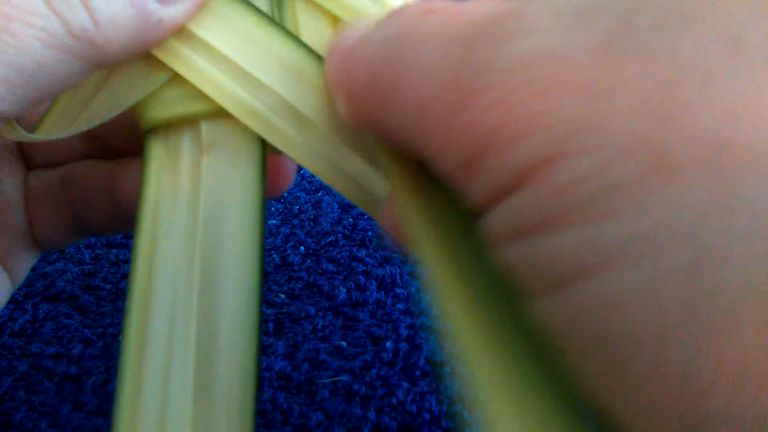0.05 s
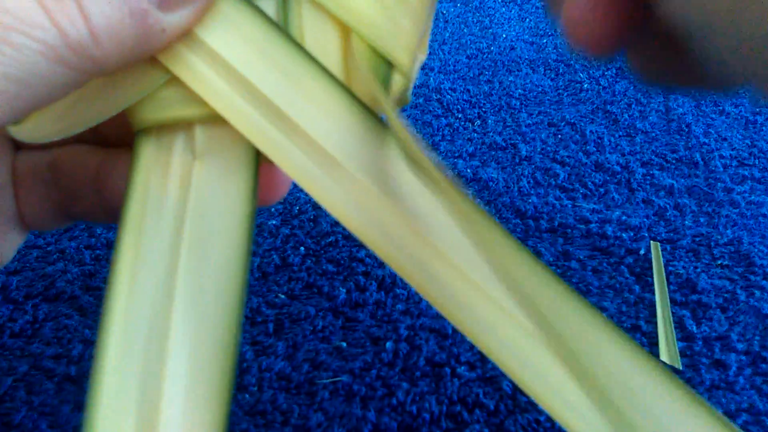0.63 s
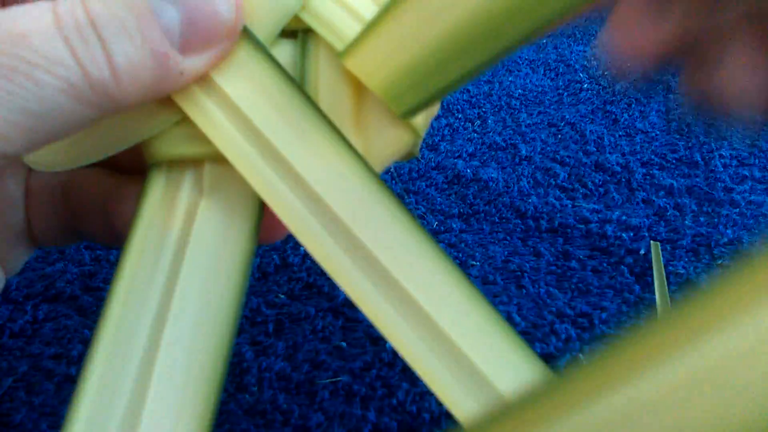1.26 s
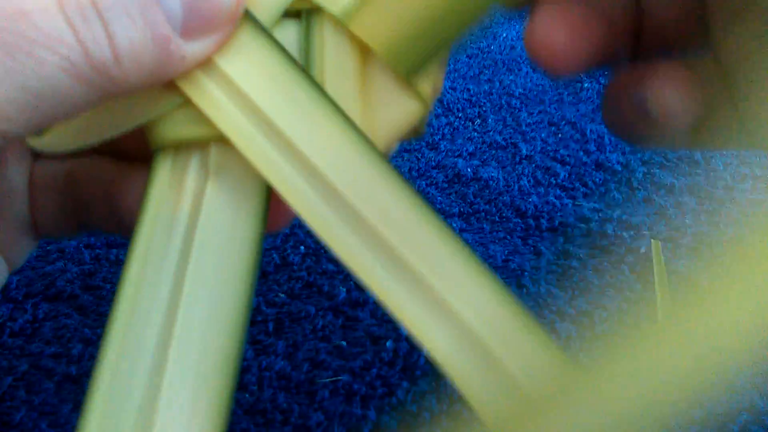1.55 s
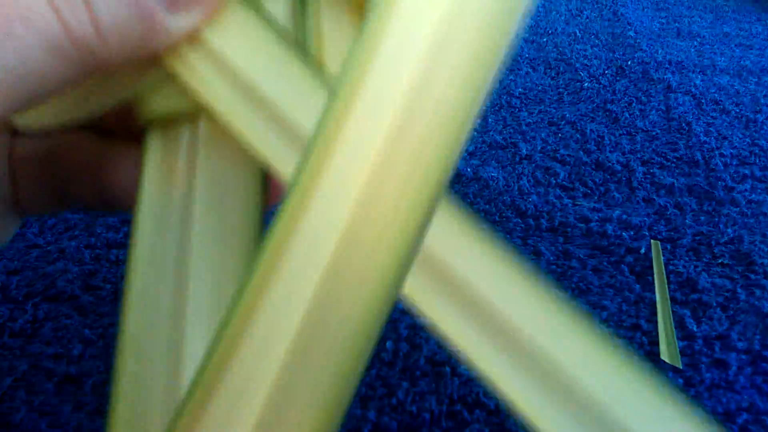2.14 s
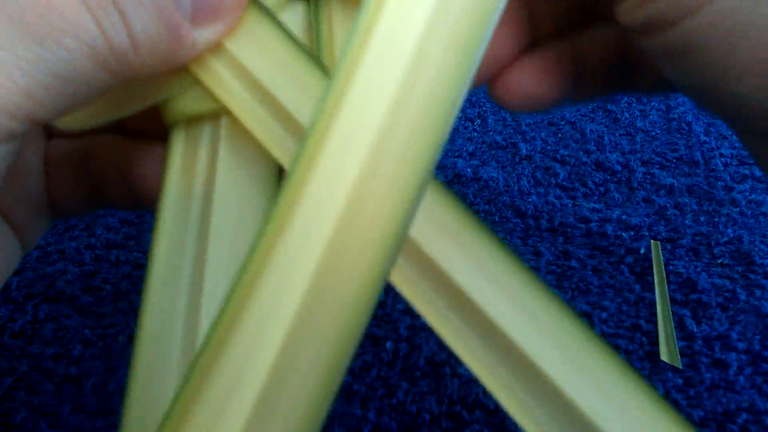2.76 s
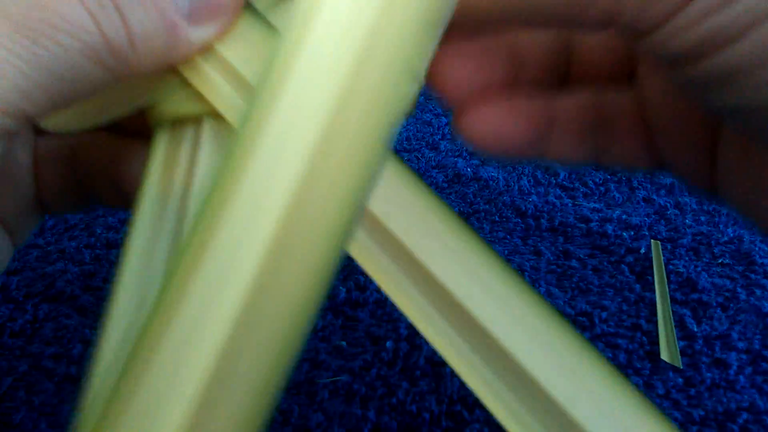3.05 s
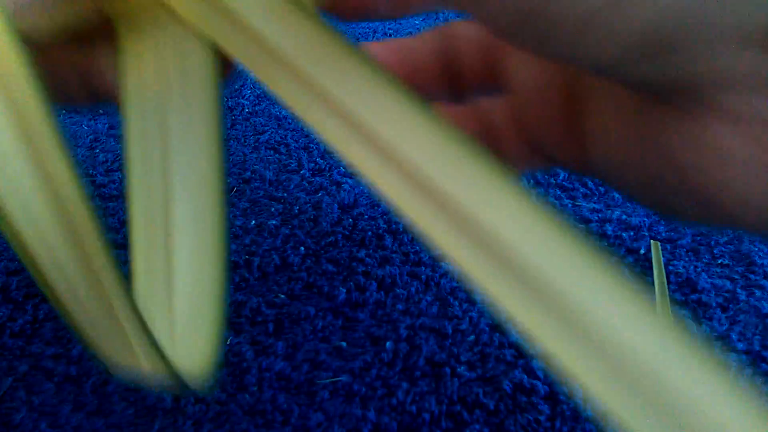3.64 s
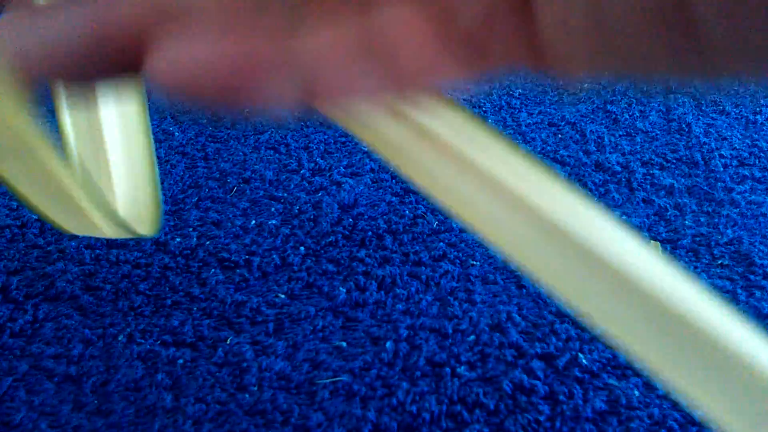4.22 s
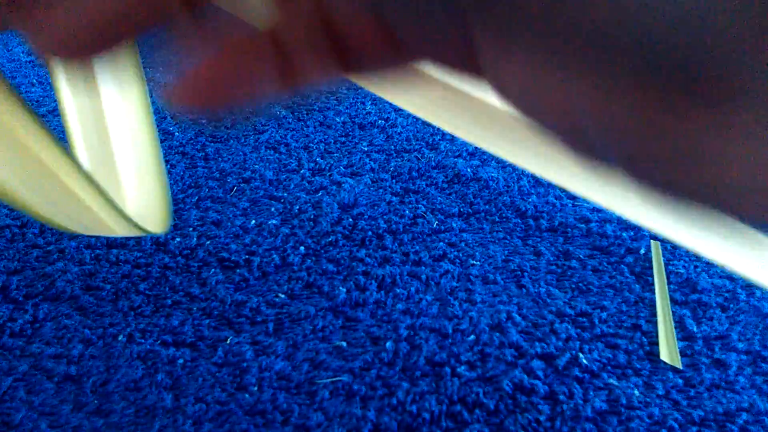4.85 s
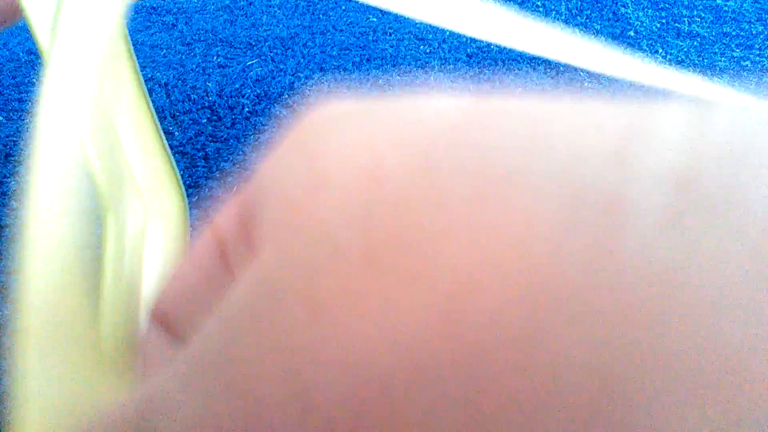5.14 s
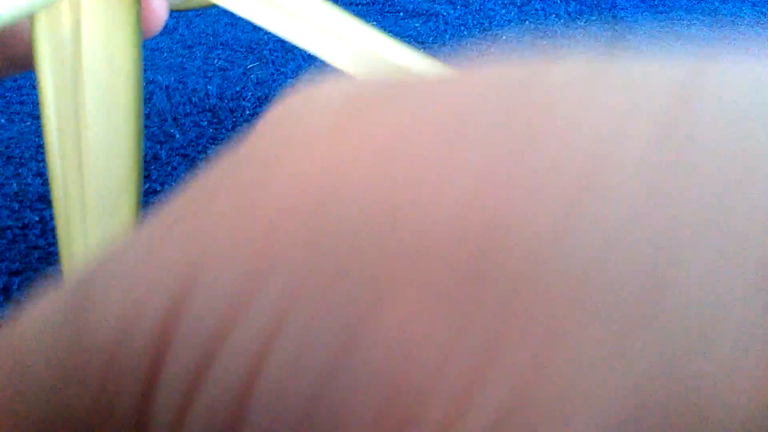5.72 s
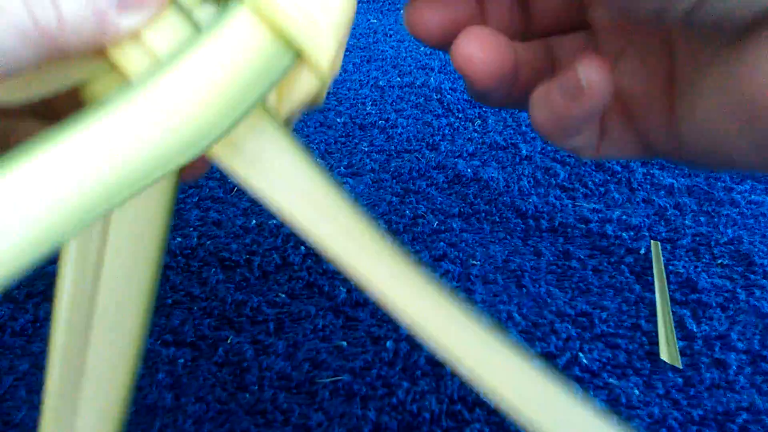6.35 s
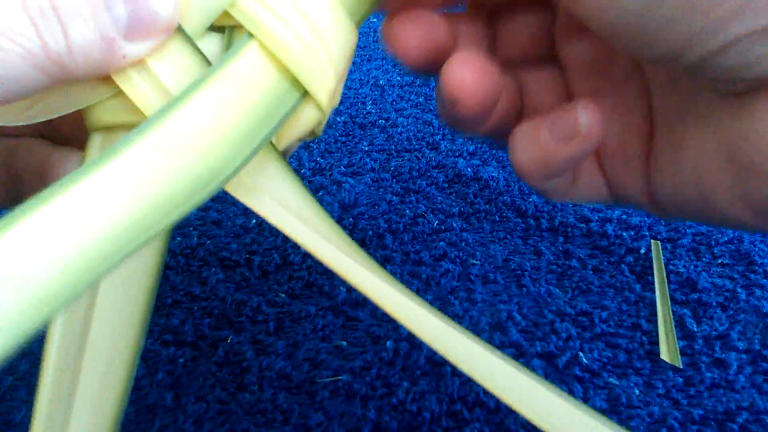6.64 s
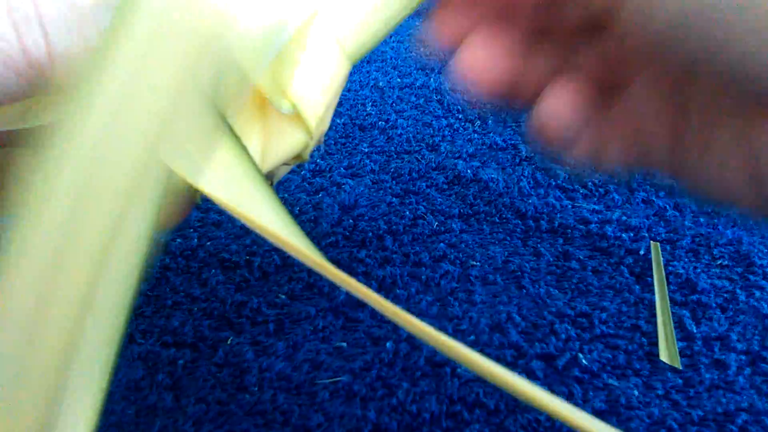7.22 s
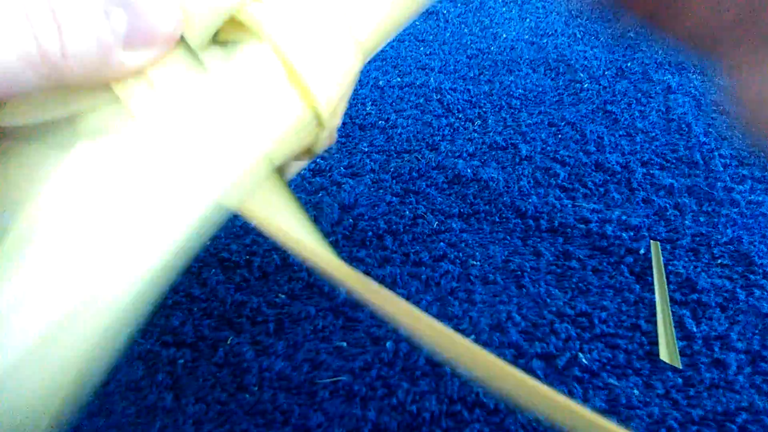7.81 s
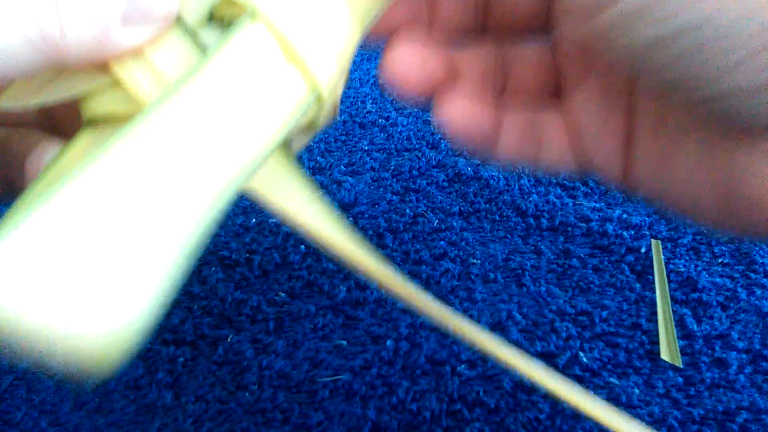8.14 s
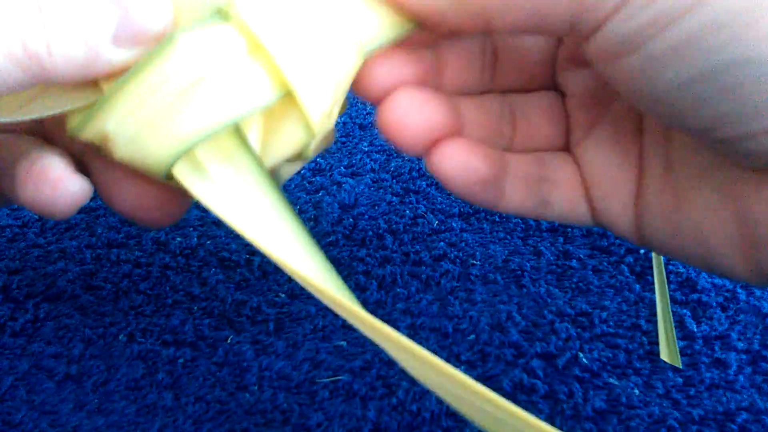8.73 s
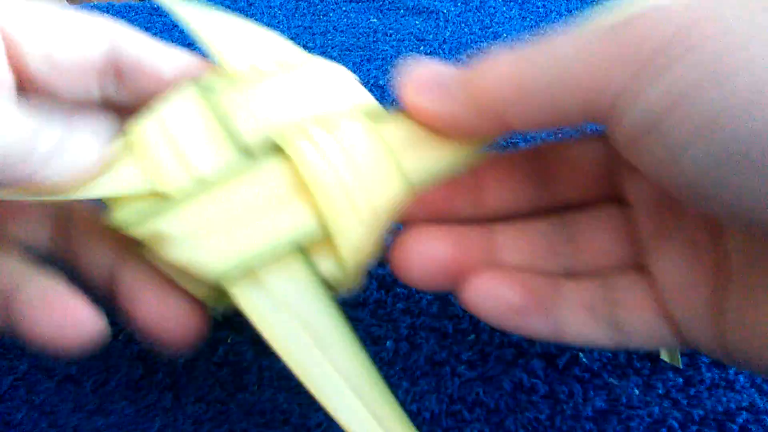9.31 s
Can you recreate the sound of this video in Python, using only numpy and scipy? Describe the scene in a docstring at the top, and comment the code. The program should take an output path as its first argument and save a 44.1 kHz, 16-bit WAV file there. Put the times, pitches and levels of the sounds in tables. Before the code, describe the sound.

Dry palm leaves rasp and rustle in uneven pulls as they are woven by hand, right by the microphone in a quiet, small room. Early on, a strip end hits the microphone with a sharp, clattering knock, followed by a weaker one. Leaf ribs then tick and snap, waxy surfaces squeak briefly, and fingers scuff and tap the weave. Soft low bumps come in the middle, and the sliding grows busier toward the end.

```python
"""Weaving dry palm strips

Hands weave close to a phone in a small, carpeted room. Strips slide over each other and over skin in
grainy stick-slip strokes, squeak, click where a rib or edge snaps free, and are tapped by fingers.
Twice a loose strip end slaps the phone beside its right microphone and rings its body. Underneath
sit puffs of air and soft bumps from the hands, a short room echo and a low murmur."""
import sys
import numpy as np
from scipy import signal
from scipy.fft import rfft, irfft
from scipy.io import wavfile
from scipy.ndimage import uniform_filter1d, map_coordinates

SR = 44100
rng = np.random.default_rng(int(sys.argv[2]) if len(sys.argv) > 2 else 0)


def put_to_file(sound):
    """Save the sound as 16-bit audio at rate SR, in the file named by the first command-line argument."""
    columns = np.atleast_2d(sound).T  # one column per channel
    safe = np.clip(columns, -1, 1)
    whole_steps = np.round(safe * 32767)
    wavfile.write(sys.argv[1], SR, whole_steps.astype(np.int16))


N = 417627
TIME = np.arange(N) / SR
HIT_TIME = TIME[:8192]  # time axis of one transient

# sliding strokes: (start [s], speeding up [s], slowing [s], peak level [dB], relative skin scuff [dB])
SLIDING_STROKES = [(0, .12, 0.14, -51, -5.5), (0.253, 0.093, 0.087, -58.5, -8.5),
                   (0.467, 0.018, 0.078, -52.5, -1.5), (0.602, 0.0081, 0.054, -51.5, -4),
                   (0.661, 0.082, 0.056, -60, -16), (0.753, 0.16, .01, -43, -13.5),
                   (0.882, .02, .1, -43, -9.5), (0.992, 0.036, .022, -49.5, -5),
                   (1.108, 0.0062, 0.018, -61, -11), (1.416, 0.056, 0.013, -55.5, -5.5),
                   (1.543, .03, 0.03, -55, -14), (1.617, .09, 0.19, -47.5, -11.5),
                   (1.896, 0.22, 0.071, -48, -16.5), (2.239, 0.043, 0.023, -52.5, -13),
                   (2.31, 0.044, 0.12, -60.5, -6.5), (2.562, 0.1, 0.043, -56.5, -7),
                   (2.7, 0.067, .03, -65.5, -2), (3.09, .045, .025, -63, -6),
                   (2.943, 0.094, 0.055, -53, -6), (3.16, 0.022, 0.058, -59.5, -21),
                   (3.25, .04, 0.075, -62, -18), (3.447, 0.037, 0.04, -64, -18),
                   (3.606, 0.092, 0.049, -50.5, -8.5), (3.752, .08, .12, -65, -9),
                   (4.12, 0.018, 0.036, -62, -8), (4.241, 0.042, 0.03, -53.5, -1),
                   (4.32, 0.029, .03, -55.5, -3), (4.397, 0.017, 0.044, -49.5, -2.5),
                   (4.459, 0.025, .013, -48, -0.5), (4.54, 0.0039, 0.028, -50.5, 3.5),
                   (4.755, 0.034, 0.065, -56, -5.5), (5.083, 0.031, .022, -51, -6.5),
                   (5.128, 0.058, 0.052, -63, 4), (5.36, 0.031, 0.042, -65, -7),
                   (5.464, 0.032, 0.064, -55, -7), (5.554, 0.046, 0.026, -63.5, 3.5),
                   (5.628, 0.019, 0.033, -41.5, -4.5), (5.675, .01, .07, -60.5, 0),
                   (5.867, 0.015, 0.016, -60.5, -4), (5.942, .11, 0.057, -63, -1),
                   (6.144, .006, 0.027, -61, 3), (6.329, 0.1, 0.028, -64, -5.5),
                   (6.47, 0.039, .09, -62.5, -8.5), (6.765, 0.14, 0.079, -45, -10),
                   (6.985, 0.018, 0.093, -60.5, 0), (7.125, 0.13, 0.032, -58, -4.5),
                   (7.265, 0.086, 0.033, -48, -10.5), (7.462, 0.046, 0.027, -48, -13),
                   (7.563, 0.025, 0.019, -53.5, -4), (7.617, 0.13, 0.096, -48, -12.5),
                   (7.825, 0.039, 0.092, -41, -10), (8.035, 0.047, 0.046, -51.5, -9),
                   (8.191, 0.043, 0.031, -56.5, -8), (8.278, 0.25, 0.031, -43, -12.5),
                   (8.56, 0.022, .2, -64, -9), (8.847, 0.064, .065, -56.5, -8),
                   (9.15, 0.067, 0.047, -54.5, -4), (9.285, 0.081, 0.0071, -51.5, -1),
                   (9.373, 0.034, 0.059, -53.5, -5.5)]
# waxy faces and fingers squeaking:
# (start [s], length [s], first pitch [Hz], last pitch [Hz], width [Hz], level [dB])
SQUEAK_GLIDES = [(0.932, 0.063, 5800, 5900, 600, -40.5), (0.973, 0.06, 5580, 3960, 1100, -45),
                 (1.626, 0.27, 6800, 8800, 700, -51.5), (1.947, 0.2, 10020, 11800, 1200, -62.5),
                 (4.408, 0.062, 1694, 1975, 701.5, -51), (4.346, 0.063, 3000, 3110, 400, -50.5),
                 (4.405, 0.098, 3120, 3190, 400, -48.5), (4.543, 0.028, 3170, 3180, 350, -47.5),
                 (4.744, 0.095, 6500, 6900, 450, -51.5), (5.641, 0.062, 1950, 1850, 500, -48),
                 (6.031, .04, 1743, 1410, 500, -61), (6.421, 0.007, 2690, 2910, 597, -42),
                 (7.312, 0.062, 1483, 1890, 900, -58.5), (7.706, 0.051, 1105, 1376, 904, -53.5),
                 (7.855, 0.054, 871, 962, 600, -51)]
# ribs and edges snapping free: (time [s], level over 10 ms [dB], ring [Hz], fracture decay [s])
RIB_SNAPS = [(0.076, -37, 4700, 0.0025), (0.543, -48.5, 6800, 0.00067), (0.6088, -41, 6520, 0.0015),
             (0.638, -46, 2760, 0.0036), (0.9265, -32.5, 7300, 0.00069), (1.234, -43.5, 3010, 0.0048),
             (1.6464, -39, 7180, 0.00075), (2.1548, -36.5, 6480, 0.00082), (2.8518, -42, 6000, 0.0013),
             (3.0145, -46.5, 5070, 0.00092), (3.0325, -45, 5400, .0017), (3.845, -55.5, 2750, .0012),
             (4.1585, -53, 6150, .0005), (4.3595, -43, 3080, 0.0016), (4.3805, -41.5, 1700, .001),
             (4.4265, -39.5, 1930, 0.0025), (4.5535, -40.5, 3220, 0.0012), (5.0674, -47.5, 2450, 0.0014),
             (6.5463, -42.5, 4140, 0.0025), (7.8643, -36, 5930, 0.0036), (8.4148, -29, 6500, 0.00049),
             (8.5315, -37.5, 6170, 0.00043), (8.5443, -34.5, 7200, 0.00087), (8.5489, -42.5, 7130, 0.00068),
             (8.5975, -47, 5930, 0.0019), (8.8643, -51, 2910, 0.0016), (9.1757, -47, 3600, 0.00097),
             (9.2896, -42.5, 6700, 0.00062), (9.3345, -43, 4000, 0.0016), (9.4446, -44.5, 5000, 0.002)]
# blows: (time [s], level [dB], hardness [0-1], extra thump from the weight behind it [dB])
FINGER_TAPS = [(0.166, -40, 0.44, -3.5), (0.48, -53, 0.8, 6), (1.465, -53.5, .85, -1),
               (2.2934, -43.5, 1, 2.5), (3.047, -48.5, 0.74, 8.5), (4.3807, -39.5, 0.68, -3),
               (4.468, -46.5, 0.64, 1), (4.5518, -42, 0.94, -1), (4.558, -46.5, .6, -1),
               (4.8383, -30.5, 0.37, -8), (5.2083, -45.5, 0.83, 11), (5.465, -51, 0, 9.5),
               (5.471, -47.5, 0, 4), (5.573, -52, .05, 5.5), (5.66, -39.5, 0.74, -5),
               (6.408, -55, 0.26, 3.5), (6.7826, -42.5, 0.77, 0), (6.8283, -31.5, 0.65, -9.5),
               (6.842, -37.5, 0.2, -19), (7.022, -52, 0.34, 2.5), (7.228, -54, .6, 2), (7.32, -53.5, .3, 1),
               (7.514, -47.5, 0.53, 5.5), (7.893, -36.5, 0.79, -3.5), (8.78, -55.5, 0.99, 1.5),
               (8.8155, -38.5, 0.05, -2.5), (8.9823, -51, 0.97, 2), (9.146, -42.5, 0.18, -3.5),
               (9.332, -48, 0.63, -2)]  # fingers and strips on the weave
STRIP_SLAPS = [(0.8788, -36.5, 1, 12.5), (0.883, -25, 0.44, 1), (0.8911, -17, 0.54, -1),
               (0.897, -26, 0.95, 0), (0.904, -18.5, 0.52, -2), (0.912, -23.5, 0.53, -1.5),
               (0.9741, -25.5, 0.51, -2), (0.9839, -31, 0.3, 4), (1.242, -36.5, 0.87, -6),
               (1.2506, -33.5, 1, -1.5), (1.255, -39.5, 0.6, 2.5)]  # a strip end on the phone
# mix of a blow, softest then hardest contact: (thump [dB], knock [dB], crack [dB], left minus right [dB])
TAP_MIX = [(-1.5, -10.5, -31, 3), (-6.5, 0, 3.5, -10.5)]
SLAP_MIX = [(-1, -13, -26, -31), (-7, 1.5, 2, -15)]
# soft bumps of the hands near the phone: (time [s], pitch [Hz], base level [dB])
HAND_BUMPS = [(0.476, 88, -48), (3.634, 110, -48), (3.68, 80, -46), (3.715, 135, -56.5), (3.767, 62, -47),
              (3.829, 75.4, -47.5), (4.144, 85.2, -50.5), (4.195, 78.6, -50.5), (4.354, 70.5, -48),
              (4.555, 85.4, -44), (4.839, 80, -50.5), (5.65, 75, -48), (5.916, 69, -51),
              (7.915, 76.5, -44.5), (7.96, 60, -50.5), (8.04, 54.1, -49), (8.388, 71, -53)]
# resonances: (frequency [Hz], relative level [dB], t60 [s])
WEAVE_MODES = [(125.5, -7, 0.066), (207, -1.5, 0.05), (308, -0.5, 0.019), (440, 6, 0.028),
               (627, -9.5, 0.016), (847, 4, 0.011), (1140, 8, 0.0062), (1505, -3.5, 0.02), (1900, 12, 0.01)]  # the hand-held weave
PHONE_MODES = [(112, -5, 0.088), (224, 3, 0.062), (285, 9, 0.029), (411, -8, 0.1), (544, -6.5, 0.027),
               (607, 10, 0.037), (690, -0.5, 0.042), (780, 7.5, 0.027), (946, 1, 0.046), (1096, 2.5, 0.034),
               (1403, 4, 0.038), (1730, 1, 0.029), (1900, -10, 0.025)]  # the phone body
# tone curves: (frequency [Hz], relative level [dB])
LEAF_EQ = [(700, -33.5), (1900, -16), (2400, 0), (3200, 0), (4200, -2.5), (5300, -1), (6500, -1),
           (7500, -2), (9000, -7.5), (11000, -23), (16000, -44)]  # rasp of leaf on leaf
EDGE_EQ = [(7000, -32), (9500, -1.5), (10500, -3), (12500, 0.5), (14500, -1), (16000, -13.5)]  # sizzle of a sliding edge
SKIN_EQ = [(120, -19), (300, 4), (480, -0.5), (650, -2.5), (850, 0.5), (1100, -1), (1450, -2.5), (1950, 1),
           (2400, 1), (3200, -7), (7000, -32)]  # dull scuff of fingers
CRACK_EQ = [(1000, -18), (2000, 0.5), (3200, 11.5), (4200, 6), (6000, 5.5), (8000, 1.5), (10000, -9),
            (13000, -4.5), (16000, -50)]  # dry leaf cracking
BODY_EQ = [(100, -16), (300, 1.5), (600, -48), (900, 3), (1500, 3.5), (2100, 2.5), (3500, -13.5)]  # low body of a click
TIP_EQ = [(4000, -56), (8000, 6), (10000, 4), (13000, 11), (16000, 10)]  # sharp top of a click
PUFF_EQ = [(20, -16), (45, -5), (75, 5.5), (120, 3), (190, -4.5), (300, -10.5), (600, -26), (2000, -58)]  # air pushed at the microphone ports
ROOM_EQ = [(20, 5.5), (60, -4.5), (130, 0), (200, -4.5), (320, -1), (520, -10), (1000, -12.5),
           (2200, -13.5), (4500, -14.5), (8000, -18.5), (15500, -22.5)]  # indoor murmur and microphone hiss


def rubbing(motion, edge_s, rough_db, blend):
    """Strokes slip in dense grains and drag neighbouring strips along; fingers add a coarser scuff."""
    leaf = friction_grain(LEAF_EQ, 13000, blend)
    edge = undb(-10) * friction_grain(EDGE_EQ, 20000, blend)
    skin = friction_grain(SKIN_EQ, 5000, blend)
    treble = signal.sosfiltfilt(butter(3, 4600, "highpass"), leaf)
    drag = undb(-23.5) * uniform_filter1d(motion, int(0.32 * SR))
    fidget = undb(5.5 * wander(14))  # the holding hand shifts unevenly
    out = drag * fidget * (leaf + edge + undb(-4) * skin)
    for start, rise_s, fall_s, db, skin_db in SLIDING_STROKES:
        i, strength = stroke(start, rise_s, fall_s, db, edge_s)
        tilt_db = 0.078 * (db + 55) - 0.23 * (skin_db + 11)  # speed lifts the treble, fingers damp it
        high, low = balance(tilt_db)
        face = high * treble[:, i] + low * (leaf[:, i] - treble[:, i])
        face = face + undb(-3.5) * span_ring(face)
        out[:, i] += strength * (face + edge[:, i] + undb(skin_db) * skin[:, i])
    roughness = undb(rough_db * (wander(45) + wander(220)))
    return balance(-5.5) * out * roughness


def friction_grain(eq, per_s, blend):
    """A long strip rubs in several spots at once, and each port hears its own blend of them."""
    spots = [unit(drift(colour(slips(per_s, spread_db=2.5), eq), rate_hz=7, depth=.08)) for _ in range(2)]
    return np.sqrt([[1 - blend, blend], [1, 0]]) @ np.array(spots)


def slips(per_s, spread_db):
    """Dense tiny stick-slip releases, most weak and a few strong."""
    sizes = undb(spread_db * np.minimum(rng.exponential(size=N), 5))
    return (rng.random(N) < per_s / SR) * sizes * rng.standard_normal(N)


def stroke(start, rise_s, fall_s, db, edge_s, rise_db=9.5, fall_db=7.5):
    """Sample range and envelope of one stroke: it breaks loose, speeds up, slows and sticks."""
    end = start + rise_s + fall_s
    i = slice(max(int((start - edge_s) * SR), 0), int((end + edge_s) * SR))
    gate = np.clip(.5 + np.minimum(TIME[i] - start, end - TIME[i]) / edge_s / 2, 0, 1)
    early = np.interp(TIME[i], [start, start + rise_s], [1, 0])
    late = np.interp(TIME[i], [end - fall_s, end], [0, 1])
    return i, gate * undb(db - rise_db * early ** 2 - fall_db * late ** 2)


def strip_motion(edge_s):
    """Friction strength of all strokes, summed in power."""
    out = np.zeros(N)
    for start, rise_s, fall_s, db, _ in SLIDING_STROKES:
        i, strength = stroke(start, rise_s, fall_s, db, edge_s)
        out[i] = np.hypot(out[i], strength)
    return out


def span_ring(x, centre_hz=4750, spread_octaves=0.49):
    """The free span of strip shivers in a narrow resonance, at a new pitch in every stroke."""
    hz = np.clip(centre_hz * 2 ** (spread_octaves * rng.standard_normal()), SR / 20, SR / 4)
    return signal.lfilter(*signal.iirpeak(hz, Q=16.6, fs=SR), x)


def squeaks():
    """Fast, uneven stick-slip: a rough whistle that glides with the pull."""
    out = np.zeros((1, N))
    for s, length, first_hz, last_hz, width_hz, db in SQUEAK_GLIDES:
        n = int(length * SR)
        waver = signal.sosfilt(butter(2, width_hz / 2), rng.standard_normal((n, 2)) @ [1, 1j])
        phase = 2 * np.pi * np.cumsum(np.linspace(first_hz, last_hz, n)) / SR
        whistle = np.real(waver * np.exp(1j * phase))
        add(out, s, undb(db) * unit(whistle) * signal.windows.tukey(n, .35))
    return out[0]


def clicks(events, typical_hz=3880, typical_decay_s=0.00074):
    """A rib snaps free: a broad crack, a sharp tip, the brief ring of that bit of leaf, a little body."""
    out = np.zeros((2, N))
    for s, db, hz, decay_s in events:
        octaves = np.log2(hz / typical_hz)  # smaller bits ring higher and snap thinner
        body_db = -15 - 9 * octaves
        tip_db = -10.5 - 2.5 * np.log2(decay_s / typical_decay_s)  # slower fractures have less tip
        force = fracture(decay_s, shiver_db=-45, shiver_t60=0.046)
        crack = burst(colour(force, CRACK_EQ), db=-octaves)
        ping = burst(ring(force, [(hz, 0, .004)]), db=3)
        body = burst(colour(force, BODY_EQ), db + body_db)
        tip = burst(colour(force, TIP_EQ), db + tip_db)
        add(out, s, balance(-9) * (burst(crack + ping, db) + body + tip))
    return out


def fracture(decay_s, shiver_db, shiver_t60):
    """Fibres give way in a quick run, then the strip shivers more softly."""
    envelope = np.exp(-HIT_TIME / decay_s) + undb(shiver_db) * fade(shiver_t60)
    return rng.standard_normal(len(HIT_TIME)) * envelope


def rib_ratchet(start_s, gap_s, count, decay_s, jitter_s):
    """Click events of one strip pulled over the ribs of another: nearly even, growing harder."""
    return [(start_s + k * gap_s + jitter_s * late, -50 + 1.2 * k + loud,
             3700 * 2 ** (0.12 * high), decay_s)
            for k, (late, loud, high) in enumerate(rng.standard_normal((count, 3)))]


def fibre_ticks(motion, per_s, gate_db, decay_s):
    """Faint click events: stray fibres catch at random while a strip is sliding."""
    variations = rng.standard_normal((400, 3))
    places = rng.integers(0, N, len(variations))[:int(per_s * N / SR)]
    return [(TIME[i], -61.5 + 4 * loud, 4260 * 2 ** (0.31 * high), decay_s * 2 ** (.5 * long))
            for i, (loud, high, long) in zip(places, variations) if motion[i] > undb(gate_db)]


def blows(events, mix, modes, split_hz, contact_s, scrape_db, scrape_t60, pad_hz):
    """Each blow thumps the low modes, knocks the higher ones and cracks the dry leaf at the contact."""
    out = np.zeros((2, N))
    soft, hard = np.array(mix)
    low_modes = [m for m in modes if m[0] < split_hz]
    high_modes = [m for m in modes if m[0] >= split_hz]
    for s, db, hardness, weight_db in events:
        thump_db, knock_db, crack_db, pan_db = soft + hardness * (hard - soft)
        force = fracture(contact_s, scrape_db, scrape_t60)
        push = burst(force, db=0) + burst(signal.unit_impulse(len(HIT_TIME)), db=0.84)
        # a blow with little crack is a soft pad, which cannot excite the high modes
        cutoff_hz = np.clip(pad_hz * undb(crack_db - knock_db), 550, SR / 4)
        push = signal.sosfilt(butter(2, cutoff_hz), push)
        thump = burst(highpass(ring(push, low_modes), 140), thump_db + weight_db)
        knock = burst(highpass(ring(push, high_modes), 258), knock_db)
        crack = burst(colour(force, CRACK_EQ), crack_db)
        add(out, s, balance(pan_db) * undb(db) * (thump + knock + crack))
    return out


def ring(force, modes):
    """Damped modes driven by a force; every strike point and grip weights and detunes them."""
    response = np.zeros(len(HIT_TIME))
    for hz, db, t60 in modes:
        gain = undb(db + 2 * rng.standard_normal())
        detuned_hz = hz * (1 + 0.034 * rng.standard_normal())
        response += gain * fade(t60) * np.sin(2 * np.pi * detuned_hz * HIT_TIME)
    return signal.fftconvolve(force, response)[:len(force)]


def air_puffs(motion, pan_db, idle_db=-70, stroke_db=-17.5, blow_db=-18.5, bump_db=-5):
    """Strips and hands push air at the ports in soft, uneven puffs; a struck strip sways on briefly."""
    power = (undb(idle_db) ** 2 + (undb(stroke_db) * motion) ** 2)[None]
    for s, db, _, weight_db in FINGER_TAPS + STRIP_SLAPS:
        add(power, s, (undb(db + weight_db + blow_db) * fade(0.25)) ** 2)
    for s, _, db in HAND_BUMPS:
        add(power, s, (undb(db + bump_db) * (1 - fade(0.043)) * fade(0.33)) ** 2)
    shared = rng.standard_normal(N)
    air = np.array([unit(colour(shared + 0.75 * rng.standard_normal(N), PUFF_EQ)) for _ in range(2)])
    return balance(pan_db) * np.sqrt(power) * undb(2.1 * wander(25)) * air


def hand_bumps(t60, phase_spread_rad):
    """A padded hand nudges what the phone rests on: slow, damped swings, out of step at the two ports."""
    out = np.zeros((2, N))
    for s, hz, db in HAND_BUMPS:
        phase = 2 * np.pi * hz * HIT_TIME + phase_spread_rad * rng.standard_normal((2, 1))
        swings = np.sin(phase) * (1 - fade(0.01)) * fade(t60)
        add(out, s, burst(swings, db + 6))
    return out


def around_phone(pair, lag_s, scatter_share, scatter_t60, bend_hz):
    """The left port faces away and hears late: bass bends round to it, the hands scatter the treble."""
    left, right = pair
    left = np.interp(TIME - lag_s, TIME, left)
    treble = signal.sosfiltfilt(butter(1, bend_hz, "highpass"), left)
    paths = rng.standard_normal(len(HIT_TIME)) * fade(scatter_t60)
    # many paths smear the sound in time but favour no pitch
    paths = irfft(np.exp(1j * np.angle(rfft(paths))))[:len(HIT_TIME) // 2]
    scattered = np.sqrt(scatter_share) * smear(treble, paths)
    direct = left + (np.sqrt(1 - scatter_share) - 1) * treble
    return np.array([direct + scattered, right])


def room_echo(pair, wet_db, t60, predelay_s=.004):
    """The weak, short echo of a furnished room."""
    tails = rng.standard_normal((2, len(HIT_TIME))) * fade(t60) * (HIT_TIME > predelay_s)
    return undb(wet_db) * np.array([smear(pair.mean(axis=0), tail) for tail in tails])


def room_tone(db):
    """A low indoor murmur of air, partly shared by both ports, under microphone hiss."""
    shared = 0.79 * signal.sosfilt(butter(2, 450), rng.standard_normal(N))
    return undb(db) * np.array([unit(colour(rng.standard_normal(N) + shared, ROOM_EQ)) for _ in range(2)])


def undb(db):
    """Decibels to gain."""
    return 10 ** (np.asarray(db) / 20)


def unit(x):
    """Scale to an rms of 1."""
    return x / np.sqrt(np.mean(x ** 2))


def burst(x, db):
    """Give a transient the energy of 10 ms at this level."""
    return x * undb(db) * np.sqrt(.01 * SR / np.sum(x ** 2))


def fade(t60):
    """An envelope that falls 60 dB in t60 seconds."""
    return np.exp(-np.log(1000) * HIT_TIME / t60)


def wander(rate_hz):
    """A random modulator that ramps to a new value rate_hz times a second."""
    hold = int(SR / rate_hz)
    steps = np.repeat(rng.standard_normal(N // hold + 1), hold)
    return 1.46 * uniform_filter1d(steps, hold)[:N]


def drift(x, rate_hz, depth):
    """Varispeed a steady texture so that its resonances wander."""
    playhead = np.cumsum(1 + depth * np.tanh(wander(rate_hz)))
    return map_coordinates(x, [playhead], order=3, mode="mirror")


def colour(x, eq, size=2048):
    """Apply a tone curve as a minimum-phase filter, built from its cepstrum."""
    hz, db = np.transpose(eq)
    curve_db = np.interp(np.log(np.fft.rfftfreq(size, 1 / SR) + 1), np.log(hz), db)
    cepstrum = irfft(np.log(undb(curve_db)))
    cepstrum[1:size // 2] *= 2
    cepstrum[size // 2 + 1:] = 0
    return signal.oaconvolve(x, irfft(np.exp(rfft(cepstrum))))[:len(x)]


def butter(order, hz, kind="lowpass"):
    """Sections of a filter with a flat passband."""
    return signal.butter(order, hz, kind, fs=SR, output="sos")


def highpass(x, hz):
    """Roll off the lows below hz."""
    return signal.sosfilt(butter(2, hz, "highpass"), x)


def smear(x, response):
    """Convolve with a response scaled to unit energy."""
    return signal.oaconvolve(x, response / np.linalg.norm(response))[:N]


def balance(db):
    """Two gains, db apart, that keep the total power: left and right, or high and low."""
    ratio = undb(np.atleast_1d(db))
    return np.array([ratio, np.ones_like(ratio)]) * np.sqrt(2 / (1 + ratio ** 2))


def add(track, s, sound):
    """Mix a sound into a track at s seconds."""
    start = int(s * SR)
    track[:, start:start + sound.shape[-1]] += sound[..., :N - start]


def scene():
    """The weaving up front, the slaps on the phone, and a bed of air and room."""
    motion = strip_motion(edge_s=.012)
    friction = rubbing(motion, edge_s=.012, rough_db=1.12, blend=0.69) + balance(-10) * squeaks()
    ratchet = rib_ratchet(start_s=1.7135, gap_s=.0248, count=6, decay_s=0.00057, jitter_s=0.0011)
    ticks = fibre_ticks(motion, per_s=14, gate_db=-64, decay_s=0.0021)
    snaps = clicks(RIB_SNAPS + ratchet + ticks)
    taps = blows(FINGER_TAPS, TAP_MIX, WEAVE_MODES, split_hz=360, contact_s=0.0013,
                 scrape_db=-4.5, scrape_t60=0.076, pad_hz=5500)
    slaps = blows(STRIP_SLAPS, SLAP_MIX, PHONE_MODES, split_hz=350, contact_s=0.0016,
                  scrape_db=-7.5, scrape_t60=0.067, pad_hz=3920)
    weaving = friction + snaps + taps
    close = around_phone(weaving + slaps, lag_s=.00018, scatter_share=0.89, scatter_t60=0.016,
                         bend_hz=1310)
    low_end = air_puffs(motion, pan_db=-3) + hand_bumps(t60=0.12, phase_spread_rad=0.85)
    return close + low_end + room_echo(weaving, wet_db=-17, t60=0.26) + room_tone(db=-62)


def record(dry):
    """The phone cuts the top end steeply above 16.35 kHz."""
    return signal.sosfilt(signal.ellip(10, .2, 70, 16350, fs=SR, output="sos"), dry)


dry = scene()
out = record(dry)
put_to_file(out)
```